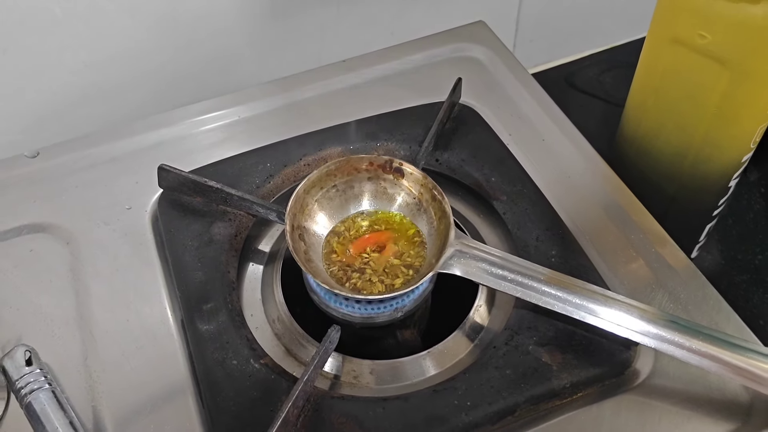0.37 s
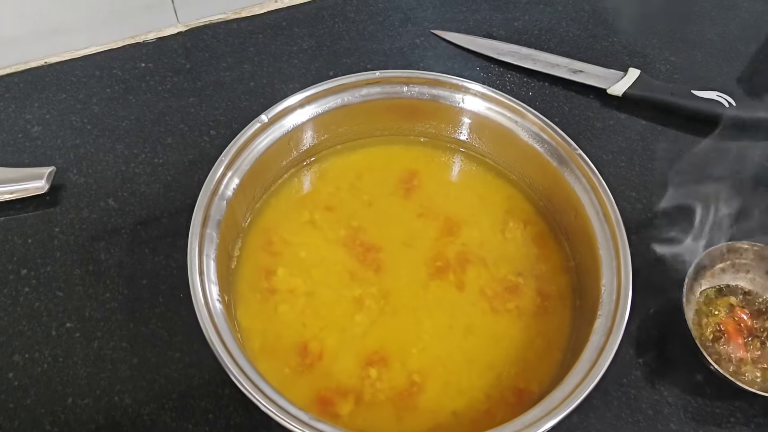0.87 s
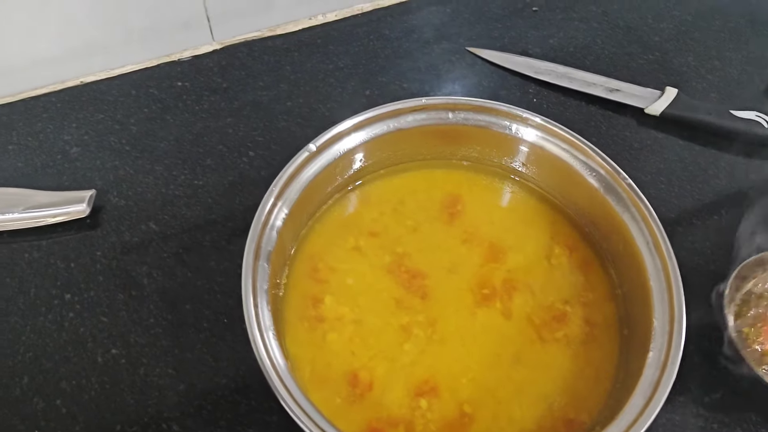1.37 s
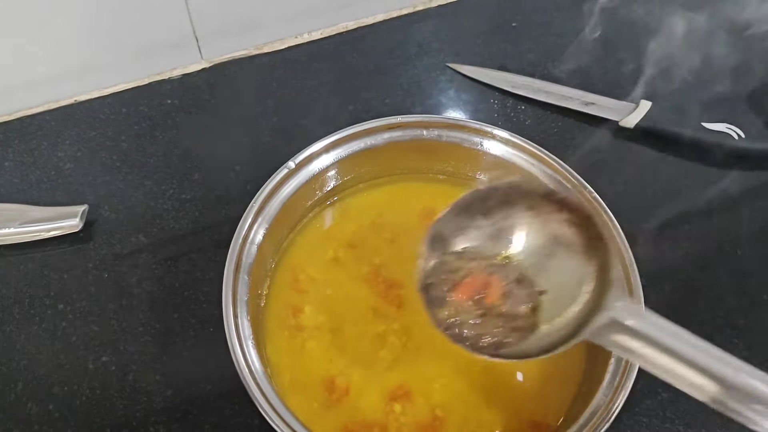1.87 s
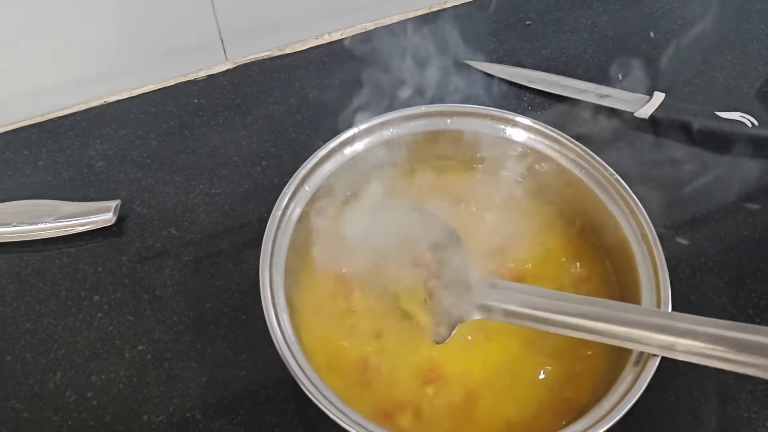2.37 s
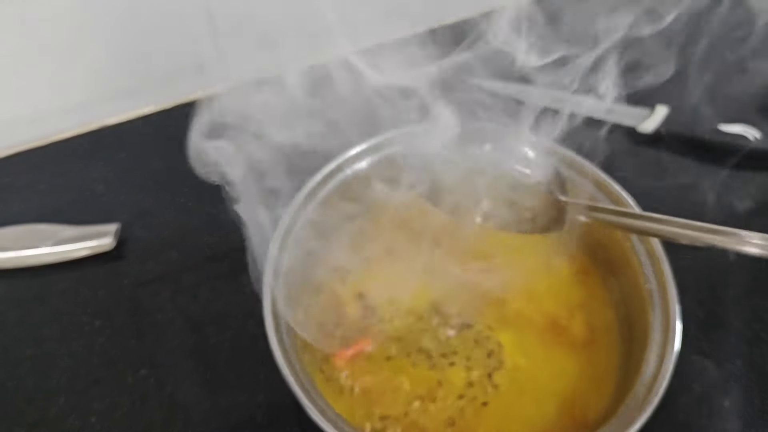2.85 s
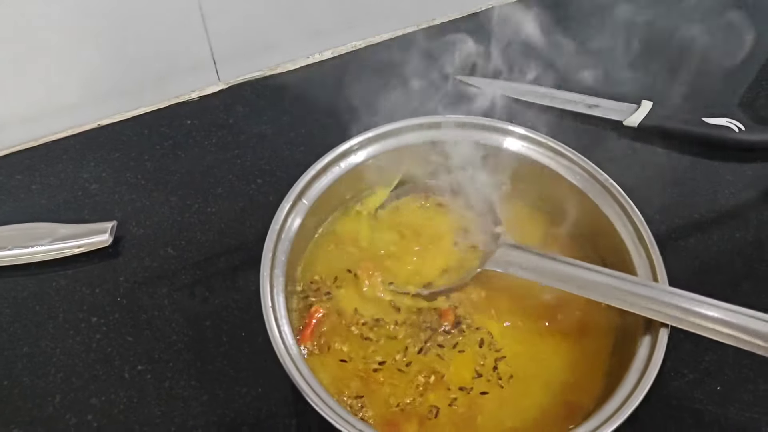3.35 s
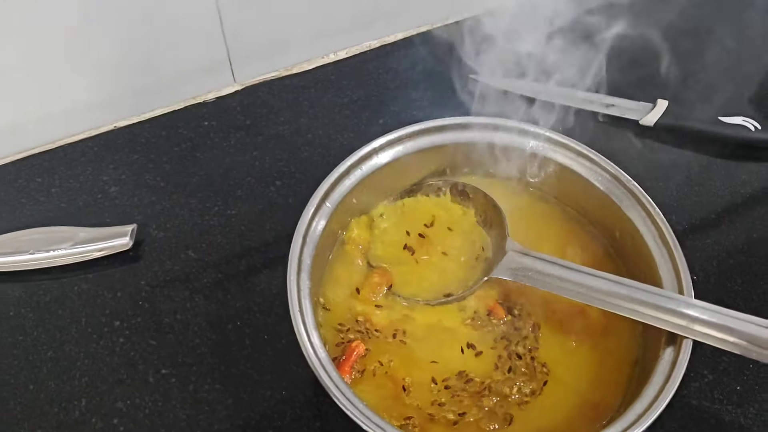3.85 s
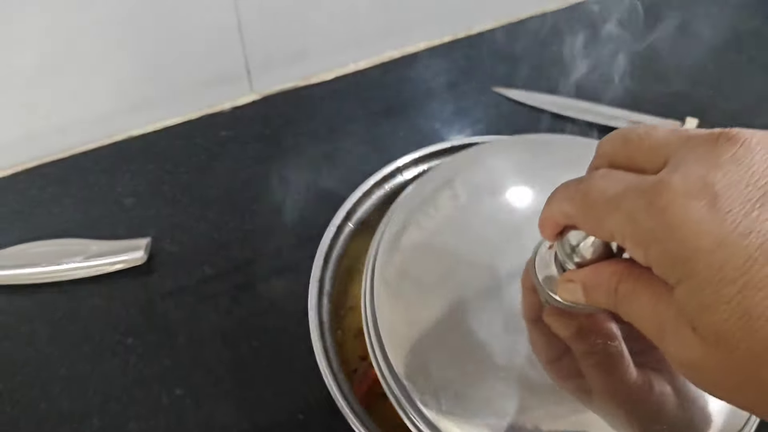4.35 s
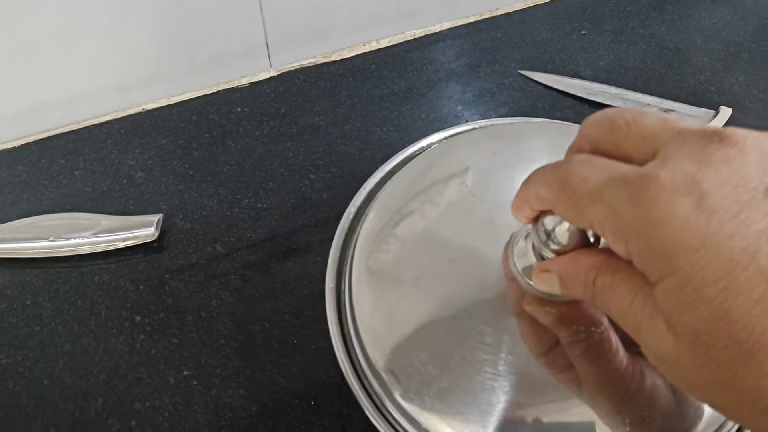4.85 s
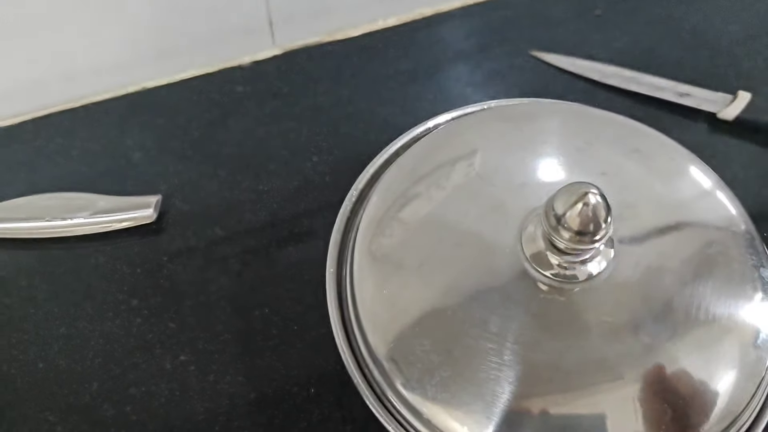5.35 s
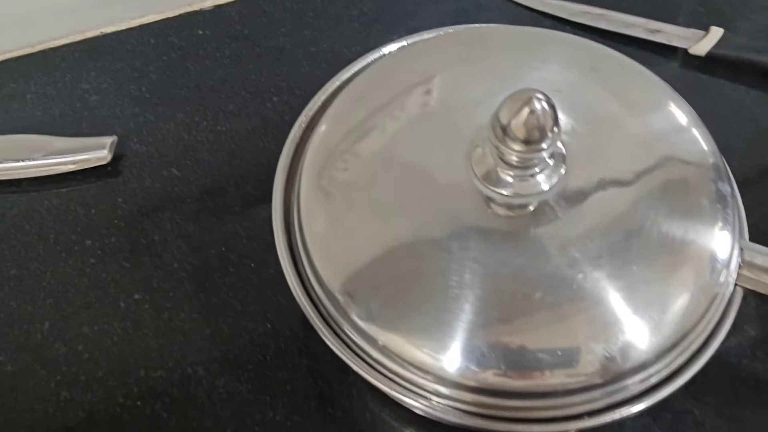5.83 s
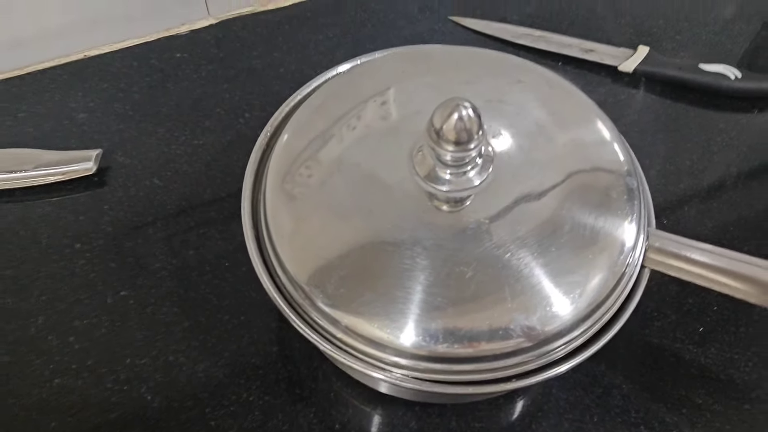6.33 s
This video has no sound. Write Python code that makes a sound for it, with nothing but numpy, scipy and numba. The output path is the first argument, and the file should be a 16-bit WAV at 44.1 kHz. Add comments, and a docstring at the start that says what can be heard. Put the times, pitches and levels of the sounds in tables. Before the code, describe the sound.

A small tiled kitchen, heard close through a hand-held stereo phone, with a short echo. From 0 s, spices fry in a small steel ladle: a thin, quiet fizz with sharp dry ticks and ringing pops, strongest around 0.1 to 0.25 s. Near 1.05 to 1.15 s a brief whistling spurt of steam hisses out. Pops thicken and the frying strengthens from 1.3 s. At about 2.1 s the oil hits thin stew and a loud, bright, sputtering roar bursts out, with froth and deep bubbling swelling to 2.5 s, then easing. At 3.4 s the dipped ladle sets off another surge, duller, with round, plopping pops until 3.8 s, then it dies down. A steel lid clatters at 4.4 to 4.55 s, with a lower, duller knock at 4.75 s; a hollow airy tone drops in pitch as the gap closes. From 4.9 s only a faint, muffled, wavering sizzle remains, with one small pop near 6.55 s.

```python
"""A thin frying fizz comes first, with spits and pops: spices in a steel ladle of hot oil.
The oil is tipped into a pot of thin stew, which boils up in a roar and again when the ladle is dipped.
A steel lid clatters on, and the sizzle goes on muffled under it.
Sizzles are swarms of damped sines, one a steam bubble; pops, cracks and knocks are struck damped sines too.
The place is a small tiled kitchen; the microphone is a hand-held phone with two ports."""
import sys
import numpy as np
from scipy import signal
from scipy.fft import rfft, irfft
from scipy.io import wavfile
from scipy.ndimage import uniform_filter1d
from numba import njit

SR = 44100
rng = np.random.default_rng(int(sys.argv[2]) if len(sys.argv) > 2 else 0)


def ratio(d):
    """dB to gain"""
    e = np.asarray(d, float) / 20
    return 10 ** e


def master_out(mix):
    """Clip the mix to full scale and print it as 16-bit PCM to the path in sys.argv[1]."""
    frames = np.transpose(np.atleast_2d(mix))
    ceiling = np.clip(frames, -1, 1)
    pcm = np.round(ceiling * 32767).astype(np.int16)
    wavfile.write(sys.argv[1], SR, pcm)


N = 295911
TIME = np.arange(N) / SR

# place of the ladle between the ports: start_s, left_minus_right_db
LADLE_SIDE = [(0.45, 5), (.6, -4), (1.5, -2.5), (1.75, -0.5)]
# how hard the oil fries in the ladle: start_s, level_db
FRYING_LEVEL = [(0.0, -39), (0.06, -46), (0.15, -40.5), (0.9, -39), (1.24, -37.5), (1.31, -44),
                (1.34, -34.5), (1.5, -31.5), (1.62, -38.5), (1.8, -33), (2.08, -28)]
# jets of steam from wet spices: peak_s, peak_db, rise_s and fall_s over 20 dB (fall before its stretch)
STEAM_JETS = [(1.043, -25.5, 0.08, 0.041), (1.112, -27.5, 0.0067, 0.089), (1.14, -32.5, 0.077, 0.15)]
# the jets whistle: centre_hz, width_hz, gain_db
JET_WHISTLES = [(2815, 90, 12.5), (6800, 80, 11), (9750, 180, 7), (12000, 60, 16)]
# colour of the frying: frequency_hz, density_db (per Hz)
FRYING_SPECTRUM = [(60, -27), (800, -19), (1700, -9.5), (2400, -0.5), (6000, 2.5), (16000, -13.5)]
# resonances of the steel bowl of the ladle: centre_hz, width_hz, gain_db
LADLE_BOWL = [(690, 40, 9), (824, 60, 7), (2850, 600, 5), (4770, 500, 3)]
# hand shifting on the phone: peak_s, peak_db, rise_s and fall_s over 20 dB (fall before its stretch)
GRIP_SHIFTS = [(.8, -49, 0.11, .2), (.97, -57, .1, .3)]
# dry ticks of single droplets: start_s, level_db
DROPLET_TICKS = [(0.075, -16), (0.155, -26.5), (0.321, -15), (0.4774, -19), (0.8327, -19), (0.9412, -17.5),
                 (1.2182, -20), (1.3528, -16), (1.371, -26), (1.8233, -20), (1.9011, -15), (3.745, -6)]
# single steam pops: start_s, level_db, pitch_hz, crack_db (relative to the pop)
STEAM_POPS = [(0.0881, -21.5, 3030, -9), (0.095, -17.5, 3100, -1.5), (0.1226, -19, 3900, -22),
              (0.1371, -10.5, 2960, 5.5), (0.2407, -7.5, 3090, -13), (0.389, -21, 2900, 0),
              (0.4028, -13, 2780, -13), (0.454, -20, 2660, 7), (0.4978, -17, 4820, -3),
              (0.5493, -17.5, 3240, -1.5), (0.608, -20.5, 3300, -3.5), (0.7086, -22, 4500, -3),
              (0.72, -18.5, 3040, 0), (1.3255, -13.5, 4800, -29), (1.401, -19, 4200, -15),
              (1.4412, -12, 3020, -3.5), (1.4582, -8, 2900, -18), (1.5338, -8, 3470, -22),
              (1.5763, -17, 5200, -23), (1.675, -14, 4700, -14), (1.79, -15, 2730, -20),
              (1.8445, -10, 2460, -7), (1.9628, -3.5, 2370, -12), (2.0103, -11, 4860, -15.5),
              (3.408, -8, 2000, -21), (3.4991, -3.5, 1760, -28), (3.6, -7.5, 3750, -11.5),
              (3.662, -10, 1900, -37), (3.723, -15, 1980, -13.5), (3.7606, -10.5, 1870, -21),
              (6.56, -18, 2920, -22.5)]
# surges of steam as oil and hot steel meet the stew: peak_s, peak_db, rise_s and fall_s over 20 dB
# (fall before its stretch)
STEAM_SURGES = [(2.088, -15, .012, 0.12), (2.5, -15, 1.37, 0.64), (3.06, -26.5, 0.18, 0.75),
                (3.25, -27.5, 0.085, 0.31), (3.375, -16.5, 0.06, 0.62), (3.77, -26.5, 0.33, 0.21),
                (4.05, -29, 0.86, 1.6)]
# big bubbles welling up through the stew: peak_s, peak_db, rise_s and fall_s over 20 dB (fall before its stretch)
STEW_GURGLES = [(2.17, -46, 0.1, 1), (2.5, -24, 0.82, 0.15), (3.25, -33.5, 0.18, 0.15),
                (3.38, -28.5, 0.065, 0.54), (3.62, -34.5, 0.26, 0.17), (3.77, -33.5, 0.17, 0.27)]
# fresh oil foaming on the surface, one row: peak_s, peak_db, rise_s and fall_s over 20 dB (fall before its stretch)
OIL_FOAM = (2, -14, .1, 0.59)
# colour of the boiling stew: frequency_hz, density_db (per Hz)
STEW_SPECTRUM = [(50, -31), (105, -6.5), (200, -1), (700, -10.5), (1300, -0.5), (4500, -4), (16000, -13)]
# resonances of the open pot: centre_hz, width_hz, gain_db
OPEN_POT_RESONANCES = [(365.13, 72, 5.5), (585, 127, 13.5), (855, 64, 10), (1580, 122, -24),
                       (1766, 84, 6.5), (3300, 1600, 1.5), (3750, 42, 6)]
# lid meeting rim and ladle: start_s, peak_db, low_knock_db (relative), rattle_t60_s
LID_KNOCKS = [(4.402, -7, -3.5, 0.17), (4.422, -13.5, -15, 0.19), (4.4929, -6.5, -1, 0.18),
              (4.5271, -15.5, -8, 0.27), (4.7451, -17.5, 5, 0.16)]
# modes of the steel lid: pitch_hz, level_db, t60_s (shortened where the rattle is short)
LID_MODES = [(742.9, -4.5, 0.087), (1343, -3, 0.093), (2150, -3, 0.29), (3240, 11, 0.17), (3560, 0, 0.15),
             (3820, 7, 0.25), (4260, -1.5, 0.23), (4724, 2.5, 0.3), (7820, -3, 0.058)]
# colour of the rattle, steel on steel: frequency_hz, density_db (per Hz)
CLATTER_SPECTRUM = [(200, -13.5), (500, -12.5), (800, -7), (2200, -5), (2650, -15), (3100, -3), (4200, -6),
                    (5500, 0.5), (16000, -10)]
# air in the pot as the gap under the lid narrows: start_s, resonance_hz, level_db (before its random sway)
POT_AIR = [(4.5, 760, -37), (4.58, 720, -34.5), (4.66, 626.5, -43.5), (4.71, 538, -34),
           (4.85, 437.6, -46.5), (6.1, 425.5, -46), (6.71, 420, -50)]
# sizzle under the lid: start_s, level_db, left_minus_right_db
COVERED_SIZZLE = [(4.8, -33.5, -0.5), (4.9, -37.5, 1), (6.3, -37, -2), (6.71, -40.5, 3)]
# colour of the sizzle under the lid: frequency_hz, density_db (per Hz)
MUFFLED_SPECTRUM = [(80, -19), (160, -10), (260, -22), (1000, -33.5), (2500, -11), (4500, -11), (8000, -9),
                    (16000, -12)]
# modes of the closed pot: centre_hz, width_hz, level_db (before sway, relative to the muffled sizzle)
SHUT_POT_MODES = [(1495, 60, -9), (2387, 50, -5), (2900, 50, -11), (4170, 200, -7), (4834, 80, -10),
                  (6130, 1000, -12)]
# resonances of the two phone ports: centre_hz, width_hz, left_db, right_db
PHONE_PORTS = [(4200, 1550, 2.5, 0), (8290, 1500, 1, -8), (10020, 2680, 0, 11), (13570, 610, -57, -10)]

POUR_S, DIP_S = STEAM_SURGES[0][0], 3.35  # oil meets stew; ladle goes under the surface
JET_BRIGHT_DB = -1  # finest bubbles of a jet against its middle band
LOW_FIZZ_DB, LOW_IN_JET_DB, LOW_STRETCH = -56, -19, 4.1  # coarse bubbles: steady, share of a jet, stretch of fall
HAND_DB = -68.5
THUD_IN_OIL_DB, THUD_IN_STEW_DB = -11.5, 11  # thud against crack; in oil the crack level is added once more
SPATTER_DB = -16  # droplets against their pop, before decay and random spread
BIG_IN_STEAM_DB, FROTH_IN_STEAM_DB, FROTH_IN_GURGLE_DB = -50, -11.5, 0
HISS_DB, DIPPED_HISS_DB = 1.23, -3  # the finest hiss dulls once the ladle is under the surface
POUR_RISE_S = 0.02
BOIL_CUT_S, BOIL_GONE_S = 4.935, 4.94  # what is left of the open boil is cut off once the lid is on
SECOND_MODE_DB_PER_S = 7.5  # one mode of the closed pot grows as the phone drifts round it
PORT_LAG_S = .00006  # shift at each port, in opposite directions, for a lag of 1
ROOM_T60_S, ROOM_DB, TOP_HZ = 0.34, -7.5, 15700


def columns(table):
    """Each column of a curve table at every sample, after its first column of times."""
    s, *rest = np.transpose(table)
    return [np.interp(TIME, s, column) for column in rest]


def colour(x, spectrum=((1, 0), (2, 0)), peaks=()):
    """Causal filter from a spectrum and bell-shaped resonances (minimum phase through the cepstrum)."""
    hz = np.arange(4097) * SR / 8192 + 1
    db = np.interp(np.log(hz), np.log([p[0] for p in spectrum]), [p[1] for p in spectrum])
    db = db + sum(gain / (1 + (2 * (hz - centre) / width) ** 2) for centre, width, gain in peaks)
    cepstrum = irfft(np.log(ratio(db)))
    cepstrum[1:4096] *= 2
    cepstrum[4097:] = 0
    impulse = irfft(np.exp(rfft(cepstrum)))
    return signal.oaconvolve(x, impulse[None], axes=1)[:, :N]


def unit(x):
    """Rms 1."""
    return x / np.sqrt(np.mean(x ** 2))


def band(x, lo_hz, hi_hz):
    """Steep band-pass."""
    sos = signal.butter(3, [lo_hz, min(hi_hz, .49 * SR)], "band", fs=SR, output="sos")
    return signal.sosfilt(sos, x)


def walk(per_s):
    """Slow random sway, spread near 1, with per_s fresh values a second."""
    k = int(SR / per_s)
    steps = np.repeat(rng.standard_normal(N // k + 1), k)
    return 1.24 * uniform_filter1d(uniform_filter1d(steps, k), k)[:N]


@njit
def rings(n, at, hz, t60, size):
    """Damped sines starting at fractional samples; hz in cycles per sample, at and t60 in samples."""
    out = np.zeros(n)
    for k in range(len(at)):
        w = 2j * np.pi * hz[k] - np.log(1000) / t60[k]
        i = int(at[k]) + 1
        z, p = size[k] * np.exp(w * (i - at[k])), np.exp(w)
        for j in range(max(i, 0), min(n, i + int(t60[k]))):
            out[j] += z.imag
            z *= p
    return out


def burst(s, hz, t60_s, size, lag, pan_db=0.):
    """Damped sines at both ports; each source has its own arrival lag between them."""
    pitch = np.minimum(hz / SR, .45)
    return np.array([rings(N, (s + side * lag * PORT_LAG_S) * SR, pitch, t60_s * SR,
                           size * ratio(side * pan_db / 2)) for side in (1, -1)])


def fizz(per_s, cycles, scatter_db, lo_hz, hi_hz):
    """A swarm of bubbles all over the surface, some far bigger than the rest; flat spectrum, rms 1."""
    count = int(per_s * N / SR)
    u, g = rng.random((count, 3)), rng.standard_normal((count, 2))
    hz = (lo_hz ** .5 + (hi_hz ** .5 - lo_hz ** .5) * u[:, 1]) ** 2
    size = hz ** (3 / 4) * ratio(-scatter_db * np.log(1 - .998 * u[:, 2]))
    pan_db = 7.6 * np.minimum(0.69 + hz / 4000, 1) * g[:, 1]  # low pitches spread less
    return unit(burst(u[:, 0] * N / SR, hz, cycles / hz, size, g[:, 0], pan_db))


def pan(db):
    """Left and right gains."""
    return ratio(np.array([db, -db]) / 2)


def spurts(per_s, strength):
    """Level of a sputtering boil: sudden spurts of random size that die away in about 15 ms; mean power 1."""
    starts = (rng.random(N) < per_s / SR) * rng.random(N) ** 2
    return unit(1 + strength * signal.lfilter([1], [1, -np.exp(-1 / (.015 * SR))], starts))


def swells(rows, stretch=0.88):
    """Gain of overlapping swells, each rising and falling evenly in dB; their powers add."""
    power = 0
    for s, db, rise, fall in rows:
        drop = 20 * np.maximum((s - TIME) / rise, (TIME - s) / (fall * stretch))
        power = power + ratio(2 * (db - drop))
    return np.sqrt(power)


def cracks(s, db, lag, pan_db):
    """A bursting skin: a dozen pitches over the whole range, struck within a millisecond."""
    u = rng.random((len(s), 12, 2))
    hz = ((np.arange(12) + u[..., 0]) * 1250 + 1500).ravel()
    at = (s[:, None] + .0008 * u[..., 1] ** 2).ravel()
    size = np.repeat(ratio(db - 5), 12) * ratio(-hz / 3500)
    return burst(at, hz, np.full(len(at), .003), size, np.repeat(lag, 12), np.repeat(pan_db, 12))


def ladle():
    """Fine bubbles sputter band by band over a steady coarse bubbling, ringing the bowl, until the oil is tipped out."""
    frying, jets = ratio(columns(FRYING_LEVEL)[0]), swells(STEAM_JETS)
    fine = unit(band(colour(fizz(8000, 12.0, 3.96, 960, 22800), FRYING_SPECTRUM, LADLE_BOWL), 1600, 24000))
    low = colour(fizz(3000, 14.0, 3.6, 39, 3180), FRYING_SPECTRUM, LADLE_BOWL)
    edges_hz = (1200, 3600, 6500, 20000)
    sputter = sum(band(fine, lo, hi) * spurts(35, 1.7) for lo, hi in zip(edges_hz, edges_hz[1:]))
    # the smallest droplets burst singly
    drops = ratio(-11.5) * band(fizz(100, 5., 3.5, 3800, 19000), 3400, 19000)
    spray = colour(fizz(12000, 5.3, 2.0, 2450, 13400), peaks=JET_WHISTLES)
    jet = unit(band(spray, 2700, 5300)) + ratio(JET_BRIGHT_DB) * unit(band(spray, 6400, 17000))
    # the coarse bubbling swells with the jets
    coarse = np.hypot(ratio(LOW_FIZZ_DB), ratio(LOW_IN_JET_DB) * swells(STEAM_JETS, LOW_STRETCH))
    sound = ((sputter + drops) * frying + unit(jet) * jets) * pan(columns(LADLE_SIDE)[0])
    sound = sound + unit(band(low, 32, 1080)) * coarse
    return sound * np.clip((POUR_S + 0.081 - TIME) / 0.15, 0, 1)


def hand():
    """Faint low rumble of the hand that holds the phone: low noise, mostly common to both ports."""
    noise = rng.standard_normal((2, N))
    rumble = unit(band(noise[0] + 0.23 * noise, 5.3, 53))
    return rumble * np.hypot(ratio(HAND_DB), swells(GRIP_SHIFTS))


def ticks():
    """Droplets that burst with a crack alone."""
    s, db = np.transpose(DROPLET_TICKS)
    pan_db = np.interp(s, *np.transpose(LADLE_SIDE))
    return band(cracks(s, db, rng.standard_normal(len(s)), pan_db), 2900, 30000)


def pops():
    """A ringing bubble, a sharp crack and a thud, followed by a spatter of droplets at about the same pitch."""
    s, db, hz, crack_db = np.transpose(STEAM_POPS)
    in_oil = s < POUR_S
    # hard cracks thud most
    thud_db = crack_db + np.where(in_oil, crack_db + THUD_IN_OIL_DB, THUD_IN_STEW_DB)
    lag, pan_db = 0.93 * rng.standard_normal(len(s)), np.interp(s, *np.transpose(LADLE_SIDE))
    bright = burst(s, hz, 24. / hz, ratio(db), lag, pan_db)
    bright += cracks(s, db + crack_db, lag, pan_db)
    thud_hz, thud_t60_s = np.where(in_oil, 900., 350.), np.where(in_oil, .003, .012)
    thud = burst(s, thud_hz, thud_t60_s, ratio(db + thud_db), lag, pan_db)
    # spatter: forty droplets a pop, thinning out and weakening
    u = rng.random((len(s), 40, 4))
    late = -.018 * np.log(1 - u[..., 0])
    pitch = (hz[:, None] * ratio(5.7 * (u[..., 1] - 0.03))).ravel()
    size = ratio((db + SPATTER_DB)[:, None] - 650 * late + 9 * u[..., 2] ** 2).ravel()
    drop_lag = 4 * (u[..., 3].ravel() - .5)
    bright += burst((s[:, None] + late).ravel(), pitch, 14. / pitch, size, drop_lag, np.repeat(pan_db, 40))
    # small bubbles radiate little below their own pitch
    return band(bright, 1760, 30000) + band(thud, 107, 13000)


def boil():
    """Water flashes to steam in bubbles of five sizes; it dies down, and the rest is cut off once the lid is on."""
    steam, gurgle = swells(STEAM_SURGES), swells(STEW_GURGLES)
    welling = np.hypot(gurgle, steam * ratio(BIG_IN_STEAM_DB))
    foam = np.hypot(steam * ratio(FROTH_IN_STEAM_DB), gurgle * ratio(FROTH_IN_GURGLE_DB))
    foam = np.hypot(foam, swells([OIL_FOAM]))
    hiss_db = np.where(TIME < DIP_S, HISS_DB, DIPPED_HISS_DB)
    fine = colour(fizz(8000, 9., 2.2, 1430, 18800), STEW_SPECTRUM, OPEN_POT_RESONANCES)
    spit = fizz(400, 18.0, 5.5, 1800, 2010) * np.where(TIME < DIP_S, ratio(-7), 1)  # loudest round the dipped ladle
    sharp = ratio(-7) * fizz(500, 10., 4.5, 2600, 5200)
    froth = colour(fizz(2000, 15.0, 3.3, 574, 2410), STEW_SPECTRUM, OPEN_POT_RESONANCES)
    big = colour(fizz(300, 1.64, 1.56, 36, 1200), STEW_SPECTRUM, OPEN_POT_RESONANCES)
    surge = spurts(60, 0.92)
    roar = (unit(band(fine, 1540, 4750)) + sharp) * surge
    hiss = unit(band(fine, 6340, 22500)) * ratio(hiss_db) * surge ** .5
    frothing = unit(band(band(froth, 726, 1730), 685, 1710)) * spurts(32, 0.37)
    bubbling = spit * ratio(0.5) + unit(band(big, 43, 710)) * ratio(0.77 * walk(39))
    sound = steam * (roar + hiss) + foam * frothing + welling * bubbling
    rise = np.clip((TIME - POUR_S) / POUR_RISE_S + 0.72, 0, 1) ** 2
    cut = np.clip((TIME - BOIL_CUT_S) / (BOIL_GONE_S - BOIL_CUT_S), 0, 1)
    return sound * rise * (1 - cut ** 2)


def lid():
    """Each knock rings the lid's modes afresh; a dying rattle of steel on steel keeps shaking them."""
    hz, mode_db, t60 = np.transpose(LID_MODES)
    chatter = fizz(9500, 2.6, 1.6, 140, 25000)
    shaken = sum(ratio(db) * unit(signal.lfilter(*signal.iirpeak(f, 25.), chatter))
                 for f, db in zip(2 * hz / SR, mode_db))
    rattle = unit(unit(colour(chatter, CLATTER_SPECTRUM)) + ratio(-13) * shaken)
    bright_rattle, low_rattle = band(rattle, 1770, 23000), unit(band(rattle, 283, 2040))
    out = 0
    for s, db, low_db, rattle_t60 in LID_KNOCKS:
        g = rng.standard_normal((3, len(hz)))
        # a strong low knock favours the low modes and spares the high ones
        tilt_db = (low_db - 18) * (hz < 1500) - low_db * (hz > 3500)
        size = ratio(db + mode_db + tilt_db - 18 + 2 * g[1])
        pitch = hz * (1 + 0.0039 * g[0])
        out = out + burst(s + 0 * hz, pitch, np.minimum(t60, rattle_t60 / 2), size, g[2])
        after = np.maximum(TIME - s, 0)
        fall = (TIME >= s) * ratio(db - 5.5 - 60 * after / rattle_t60)
        out = out + fall * (bright_rattle + low_rattle * ratio(low_db - 51 * after))
    s, db = np.transpose(LID_KNOCKS)[:2]
    return band(out + cracks(s, db, 0 * s, 0 * s), 210, 22000)


def cavity():
    """Bubbles stir the pot's air spring: a broken noisy band whose pitch falls as the gap closes."""
    hz, db = columns(POT_AIR)
    stir = rng.standard_normal(N) + 1j * rng.standard_normal(N)
    slow = signal.sosfilt(signal.butter(1, 45., fs=SR, output="sos"), stir)
    carrier = np.exp(2j * np.pi * np.cumsum(hz) / SR)
    tone = unit(band((slow * carrier).real, 240, 1170))
    return tone * ratio(db + 2.6 * walk(30)) * (TIME > POT_AIR[0][0]) * pan(-5.0)[:, None]


def covered():
    """The sizzle leaks out dully and through the modes of the closed pot, which swell and fade one by one."""
    level_db, pan_db = columns(COVERED_SIZZLE)
    bubbles = fizz(9000, 5.8, 0.22, 39, 29300)
    modes = []
    for hz, width, db in SHUT_POT_MODES:
        sway_db = 1.5 * walk(4.08) + 2.3 * walk(25)
        ringing = unit(signal.lfilter(*signal.iirpeak(hz, hz / width, SR), bubbles))
        modes.append(ringing * ratio(db + sway_db))
    modes[1] = modes[1] * ratio(SECOND_MODE_DB_PER_S * (TIME - 6.0))
    leak = unit(band(colour(bubbles, MUFFLED_SPECTRUM), 37, 19300))
    sound = unit(leak + sum(modes)) * spurts(40, .45)
    return sound * pan(pan_db) * ratio(level_db) * np.clip((TIME - 4.6) / 0.29, 0, 1)


def kitchen(dry):
    """Short diffuse echo of decaying noise, different at each port in the treble and shared in the bass."""
    t = TIME[:SR // 2]
    noise = rng.standard_normal((3, SR // 2))
    echo = band(noise[:2], 1060, 19500) + band(noise[2], 81, 1360)
    echo = echo * ratio(-60 * t / ROOM_T60_S) * (t > .003)
    echo *= ratio(ROOM_DB) / np.sqrt(np.sum(echo ** 2) / 2)
    return signal.oaconvolve(dry, echo, axes=1)[:, :N]


def scene():
    """All sources with their kitchen echo, plus the hand on the phone."""
    dry = ladle() + ticks() + pops() + boil() + lid() + cavity() + covered()
    return dry + kitchen(dry) + hand()


def top_cut(x):
    """Nothing passes above the cut-off."""
    return signal.sosfilt(signal.butter(12, 16820, fs=SR, output="sos"), x)


def record(dry):
    """The phone: each port has its own resonances; peaks are rounded and the top is cut."""
    ports = []
    for c in range(2):
        peaks = [(row[0], row[1], row[2 + c]) for row in PHONE_PORTS]
        ports.append(colour(dry[[c]], peaks=peaks)[0])
    rounded = .7 * np.tanh(np.array(ports) / .7)
    mix = signal.sosfilt(signal.ellip(6, .3, 45, TOP_HZ, fs=SR, output="sos"), rounded)
    return top_cut(mix)


dry = scene()
out = record(dry)
master_out(out)
```